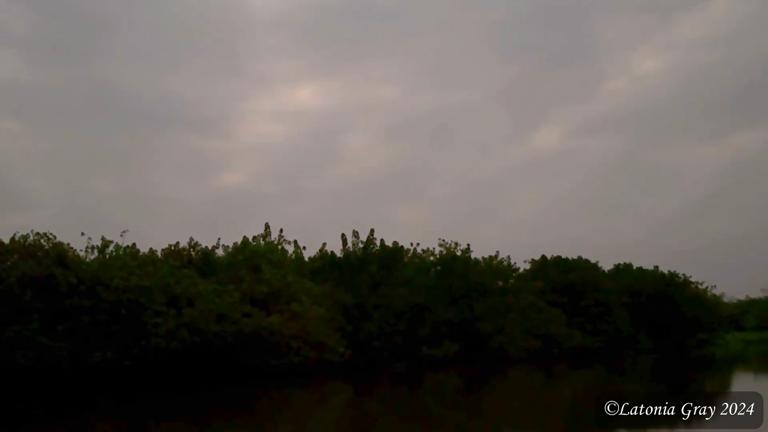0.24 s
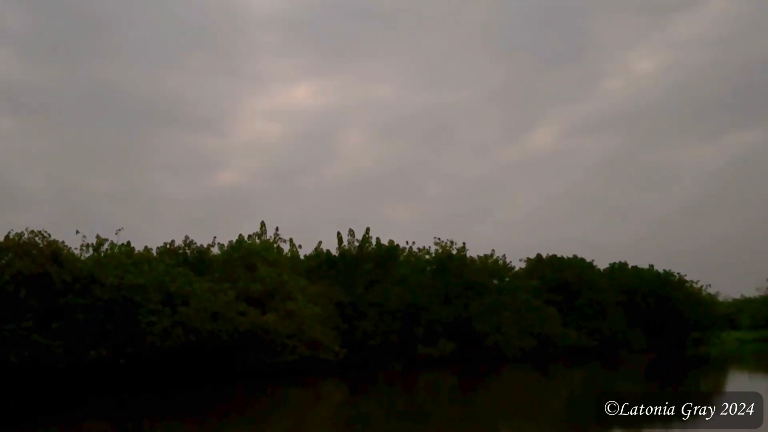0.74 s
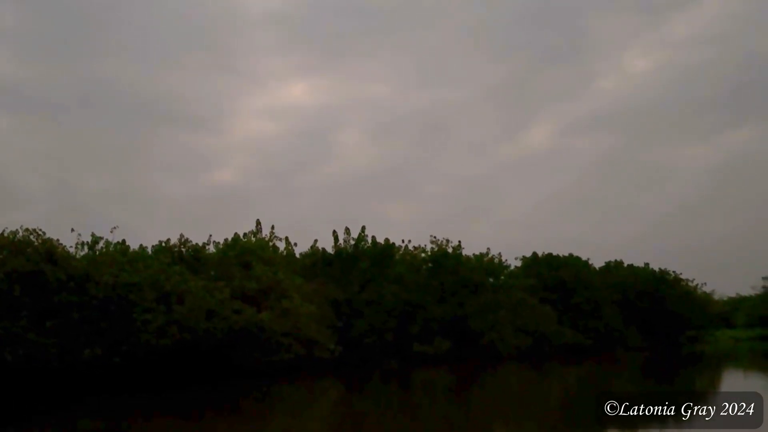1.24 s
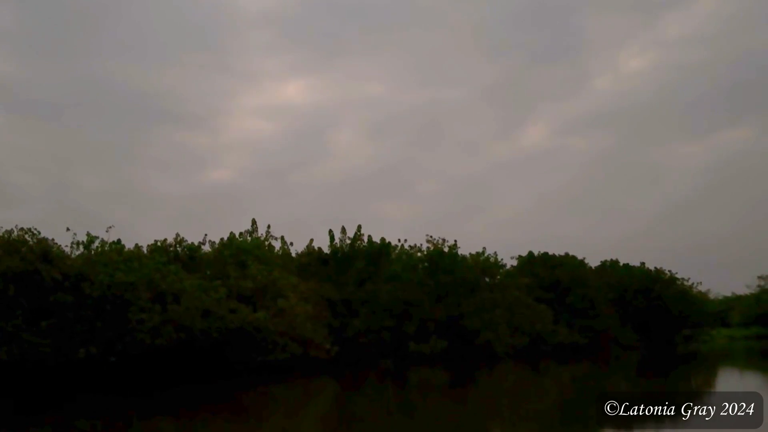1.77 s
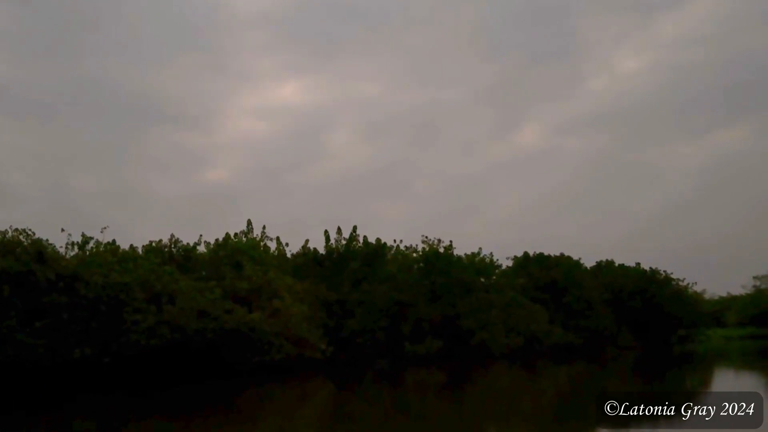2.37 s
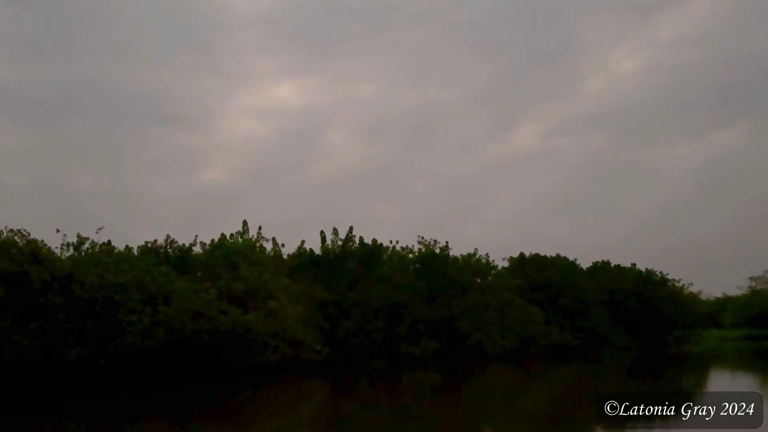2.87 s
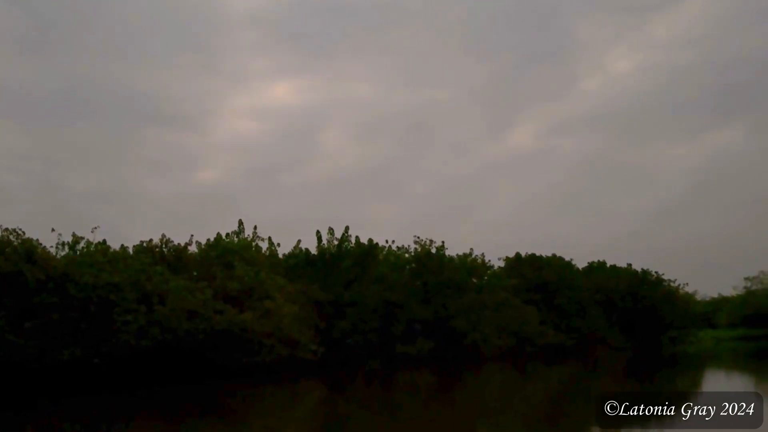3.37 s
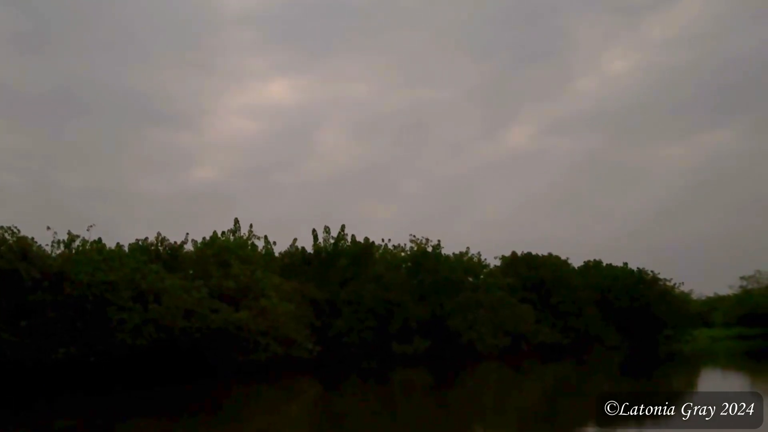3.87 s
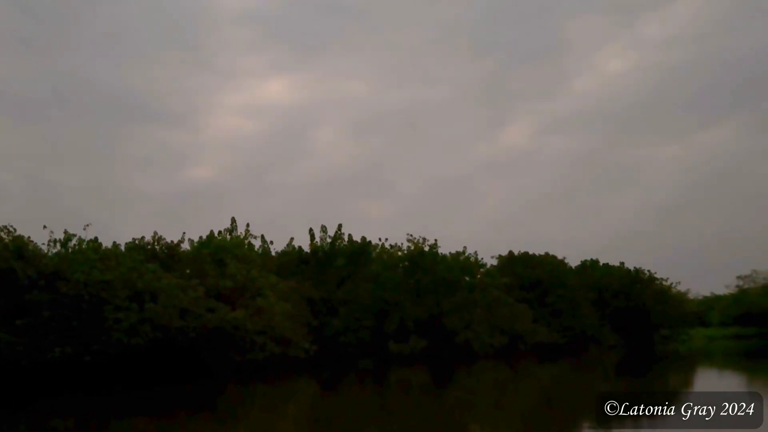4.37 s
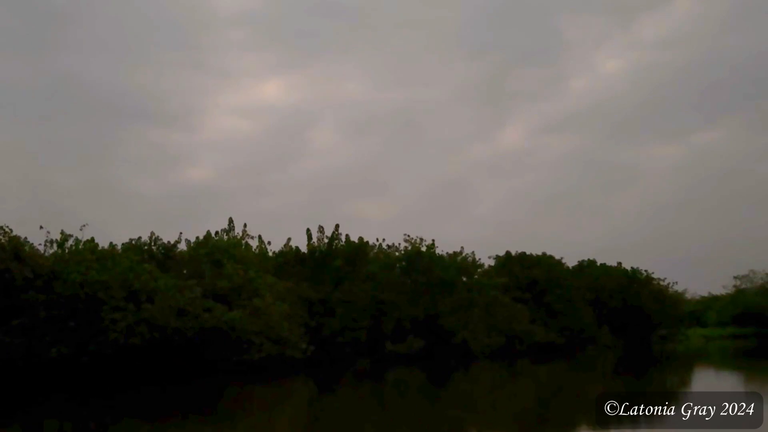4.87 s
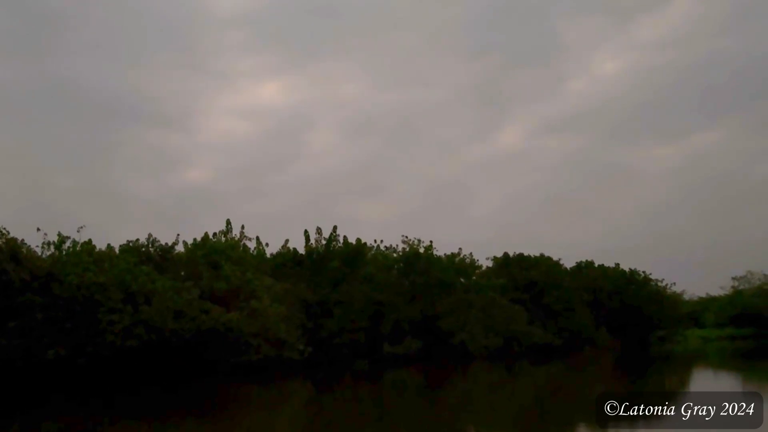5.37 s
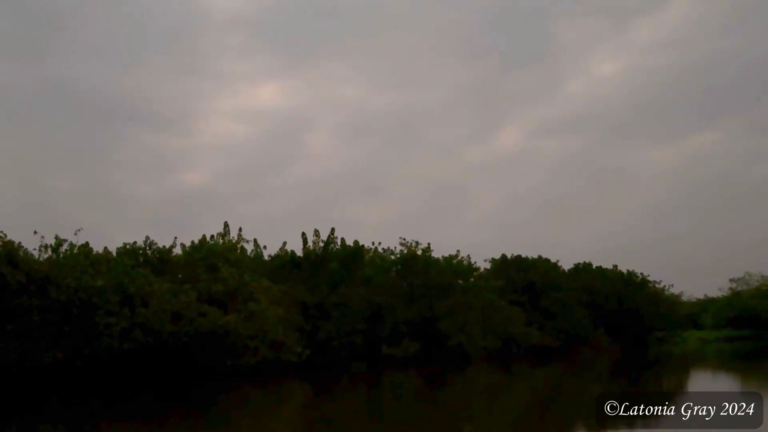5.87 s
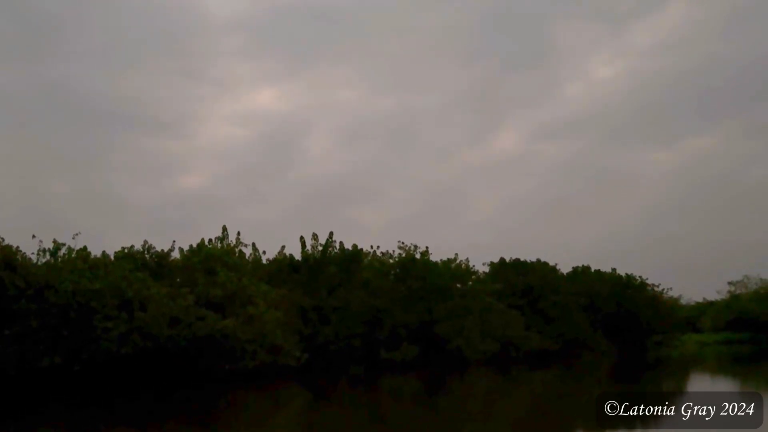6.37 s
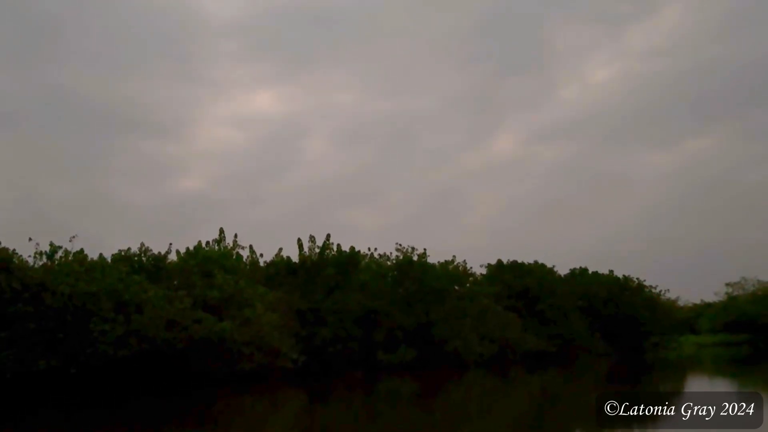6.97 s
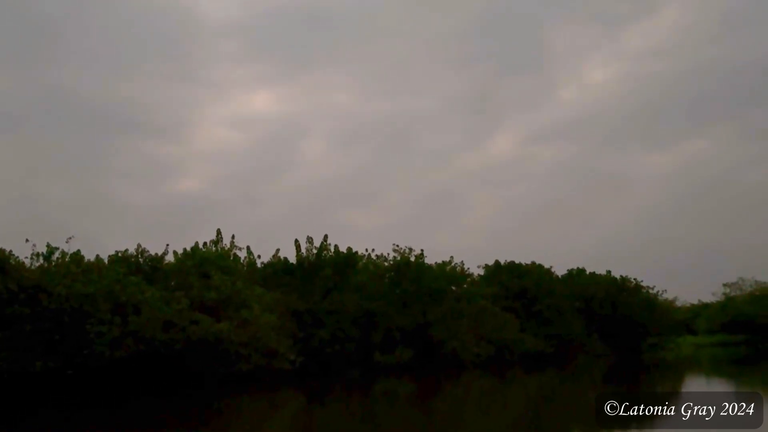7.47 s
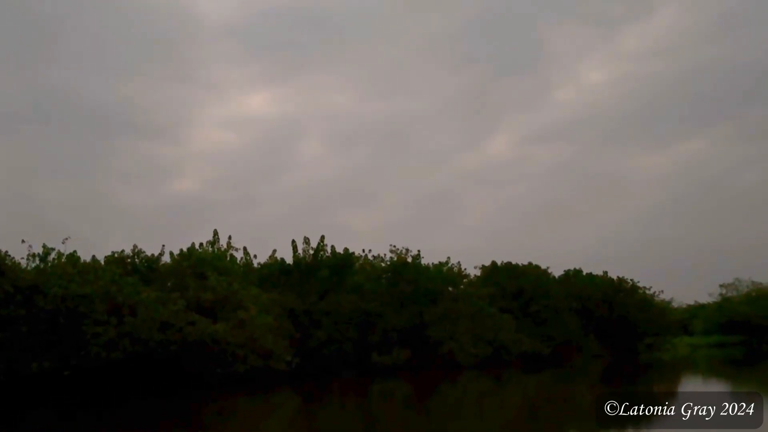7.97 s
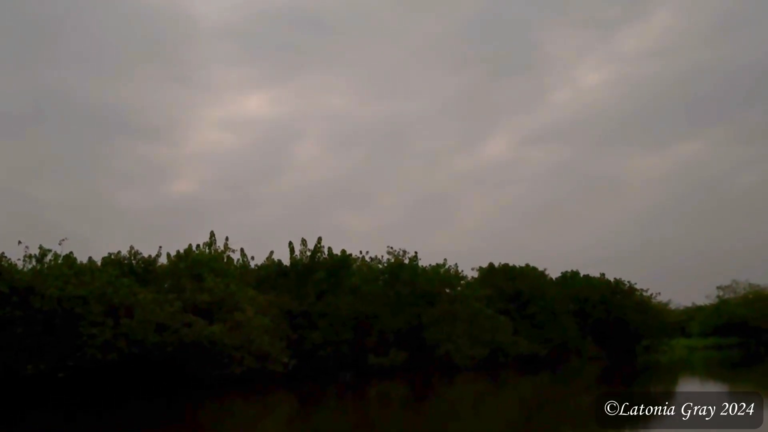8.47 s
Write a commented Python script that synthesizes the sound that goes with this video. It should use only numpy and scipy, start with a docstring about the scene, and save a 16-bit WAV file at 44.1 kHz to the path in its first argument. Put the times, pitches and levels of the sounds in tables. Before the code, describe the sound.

A flock of small birds chirps and trills in a dense, high chorus, over hissing insects and a light breeze.

```python
"""Rolled, arching calls of bee-eaters roosting in trees across still water at dusk, near ones over a crowd.
Higher birds whistle, chip and swoop among them. Each call is a gliding near-sine, scattered by leaves
and water. Insects hiss and rasp over a light breeze; a hollow pop and soft bumps come from close by.
The stereo image is widest in the upper treble and narrows to centre near 2 and 6 kHz."""
import sys
import numpy as np
from scipy import signal
from scipy.fft import rfft, irfft, next_fast_len
from scipy.io import wavfile
from scipy.ndimage import uniform_filter1d

SR = 44100
rng = np.random.default_rng(int(sys.argv[2]) if len(sys.argv) > 2 else 0)


def output_pcm(signal):
    """Save a mono or channel-first signal as 16-bit PCM at the path in sys.argv[1].

    Samples are clipped to [-1, 1] before scaling.
    """
    pcm = np.clip(np.atleast_2d(signal).T, -1, 1) * 32767
    wavfile.write(sys.argv[1], SR, np.round(pcm).astype(np.int16))


N = 385434

# Near bee-eaters. Each row: start in seconds, length in seconds, level in dB, turn pitch in Hz,
# arch height in Hz (negative dips).
BEE_EATER_CALLS = [(.009, 0.027, -45.5, 2276, 17), (0.02, 0.094, -47.5, 2344, -250),
                   (0.108, 0.035, -52.5, 2300, -200), (.207, 0.072, -48.5, 2810, 423),
                   (.304, 0.057, -42.5, 2570, 329), (0.405, 0.075, -58.5, 2430, -4),
                   (0.497, 0.044, -55, 2700, 100), (0.527, 0.043, -49, 3040, 148),
                   (0.631, .047, -44, 2475, 144), (0.645, 0.05, -57, 2800, 73),
                   (0.84, 0.052, -42.5, 2536, 358), (0.857, 0.062, -53, 2720, 0),
                   (.973, 0.052, -50, 2640, 238), (1.173, 0.086, -56, 2830, 222),
                   (1.197, .054, -41, 2560, 328), (1.337, 0.11, -55, 2765, 102),
                   (1.379, .091, -49, 3070, 287), (1.542, .054, -54.5, 2630, 411),
                   (1.602, 0.059, -45, 2582, 410), (1.739, .058, -48.5, 2800, -280),
                   (1.795, 0.058, -47, 2735, 364), (1.883, .063, -47.5, 2507, 148),
                   (2.01, 0.069, -54.5, 3180, 243), (2.122, .065, -45.5, 2570, 288),
                   (2.342, 0.058, -45.5, 2610, 80), (2.348, 0.036, -50, 2980, 125.5),
                   (2.418, 0.077, -51, 3022, 87), (2.751, 0.079, -58, 3030, 365),
                   (2.874, 0.047, -58, 2940, 304), (2.921, 0.059, -53, 2560, 70),
                   (2.953, 0.074, -50.5, 3080, 33), (3.021, 0.094, -59.5, 2840, -180),
                   (3.097, 0.021, -55, 2750, 300), (3.285, 0.068, -48, 2890, 642),
                   (3.289, 0.044, -46.5, 3043, 423), (3.302, 0.032, -44, 2607, 195),
                   (3.386, .093, -49.5, 2880, 178), (3.572, 0.044, -48.5, 3020, 383),
                   (3.83, .053, -51.5, 2760, 242), (3.886, 0.049, -56, 2770, 426),
                   (4.049, 0.064, -48.5, 2910, 299), (4.176, 0.077, -55.5, 3050, 721),
                   (4.28, 0.047, -50.5, 2450, 277), (4.411, 0.061, -50.5, 2488, -150),
                   (4.553, 0.089, -56, 2647, -91), (4.624, 0.086, -65, 2970, 307),
                   (4.655, 0.044, -44, 2870, 43), (4.741, 0.033, -46.5, 2763, 112),
                   (4.853, 0.071, -55, 2790, 384), (4.985, 0.035, -48, 2586, 149),
                   (5.022, 0.089, -48.5, 2587, -160), (5.093, 0.07, -54.5, 2950, 644),
                   (5.241, 0.084, -60, 2950, 688), (5.295, 0.021, -57, 2600, 100),
                   (5.437, 0.086, -55, 2815, 252), (5.664, 0.072, -66, 2820, 440.5),
                   (5.789, .043, -56, 2920, -26), (5.824, 0.074, -51.5, 3060, 589.5),
                   (5.965, .074, -49, 2993, 220), (6.097, 0.039, -50, 2625, -270),
                   (6.191, 0.06, -51, 3050, 534.5), (6.281, 0.05, -45.5, 2740, 54),
                   (6.582, .071, -50.5, 2900, -180), (6.633, 0.071, -57, 2824, 12),
                   (6.879, 0.051, -46, 2975, 319), (6.967, 0.037, -45, 3045, 383),
                   (6.991, 0.066, -54.5, 2224, 7), (7.026, 0.14, -55, 2514, -100),
                   (7.158, 0.086, -53.5, 2574, -230), (7.363, 0.055, -45, 2950, 90),
                   (7.381, 0.039, -47, 2590, 62), (7.426, .065, -49, 2860, 352),
                   (7.467, 0.037, -49, 2940, 0), (7.559, 0.073, -51, 2823, 383.5),
                   (7.673, 0.077, -50, 2430, -220), (7.706, 0.04, -51.5, 3030, 270),
                   (7.829, 0.086, -55.5, 2556, 108), (8.038, 0.083, -48, 2580, 104),
                   (8.077, 0.037, -39.5, 2663, -52), (8.218, 0.054, -51, 3053, -120),
                   (8.322, 0.067, -47.5, 2703, 370), (8.436, 0.1, -51.5, 2867, -3),
                   (8.523, 0.048, -41, 2555, -26), (8.564, 0.072, -55.5, 2433, -100),
                   (8.637, 0.051, -44.5, 2380, -29), (8.66, 0.057, -52.5, 3114, 20)]
# Higher birds. Each row: start in seconds, length in seconds, level in dB, mid pitch in Hz, glide in Hz.
WHISTLES = [(0.076, 0.044, -57, 4950, 193), (0.206, 0.06, -58, 5000, 492), (0.629, .04, -55.5, 5280, 300),
            (.672, 0.04, -64, 4720, -150), (0.731, .04, -66, 5080, 498), (0.962, 0.031, -62.5, 4950, 500),
            (1.084, 0.017, -51, 5000, 337), (1.147, 0.069, -59, 5020, 203), (1.26, 0.037, -56, 5280, 500),
            (1.307, 0.02, -51, 5100, 400), (1.384, 0.02, -49, 5200, 800), (1.446, 0.012, -47.5, 4850, -880),
            (1.567, 0.03, -54.5, 4660, -1000), (1.598, 0.02, -50.5, 5060, 422),
            (1.675, 0.023, -54.5, 4880, 200), (1.828, 0.072, -65, 5760, 304),
            (2.078, .045, -62, 5450, -150), (2.157, 0.098, -62.5, 4980, -100),
            (2.328, 0.065, -53.5, 4870, -140), (2.482, 0.036, -64.5, 5360, 4), (2.745, .05, -70, 4700, 0),
            (2.962, 0.057, -58.5, 5010, 39), (3.1, .12, -63.5, 4685, -100),
            (3.319, 0.049, -53.8, 4390, 197), (3.363, .113, -54.5, 4450, 198),
            (3.366, 0.084, -58, 4890, -51), (3.561, 0.047, -56.5, 4450, 142),
            (3.594, 0.11, -51.5, 4670, -580), (3.848, .059, -48, 4430, 150), (3.902, 0.12, -49, 4510, -100),
            (4.064, 0.027, -47, 4530, -53), (4.103, 0.055, -55.5, 4430, 348),
            (4.161, 0.075, -49.5, 4486, -140), (4.198, 0.073, -59, 4570, -470),
            (4.322, 0.038, -53, 5010, 43), (4.398, 0.077, -56.5, 4390, -100),
            (4.414, 0.073, -58, 5360, 278), (4.423, .064, -50.5, 4980, 285), (4.543, .036, -51, 5020, 330),
            (4.552, 0.079, -51.5, 5580, 900), (4.646, 0.036, -47.5, 5180, -2),
            (4.703, 0.069, -54, 5500, 898), (4.736, 0.03, -46.5, 5170, 390), (4.867, 0.055, -57, 4860, 90),
            (4.992, 0.047, -61, 5150, 700), (5.833, 0.049, -55, 4800, -170), (5.958, 0.053, -52, 5400, 601),
            (5.962, 0.021, -51, 4870, 55.5), (6.11, 0.04, -49.5, 5230, 752),
            (6.509, 0.063, -55.5, 4650, -450), (6.682, .11, -65, 4970, -50), (6.867, 0.041, -54, 5010, 771),
            (7.01, 0.12, -65, 4830, 800), (7.147, 0.046, -51.5, 4900, -950),
            (7.159, 0.071, -60, 5310, -300), (7.366, 0.023, -55, 5130, 88), (7.44, 0.037, -55, 5680, 504),
            (7.53, 0.086, -67.5, 5020, -200), (7.705, .031, -57, 4770, 122),
            (7.783, 0.021, -54.5, 4950, 92), (7.813, 0.16, -62.5, 4960, -200),
            (8.111, 0.056, -53.5, 4820, 322), (8.327, 0.087, -55.5, 4930, 0),
            (8.511, 0.037, -64.5, 4930, 700)]
# One bird's repeated swoop. Each row: start in seconds, level in dB.
SWOOPS = [(4.854, -61), (5.045, -50.5), (5.243, -57.5), (5.426, -54), (5.651, -51), (5.861, -55.5),
          (6.064, -56), (6.266, -59.5)]
# Swoop contour. Each row: offset in seconds, pitch in Hz, gain in dB.
SWOOP_SHAPE = [(0, 4330, -8), (.006, 4420, 0), (.026, 4750, -4), (.035, 5250, -5), (.041, 6050, -2),
               (.044, 6100, -30), (.051, 6100, -30), (.054, 6000, -3), (.058, 5200, -9), (.063, 3700, -14),
               (.068, 3000, -28)]
# Far crowd before hushing. Each row: time in seconds, bee-eater level in dB, higher-bird level in dB.
CROWD_LEVELS = [(0, -59, -69), (.6, -55.5, -66), (.9, -54, -56), (1.45, -55, -62.5), (2.05, -58, -74),
                (2.3, -53, -73), (2.58, -52.5, -53), (2.68, -59, -94), (2.76, -45.5, -54),
                (3.24, -51.5, -64), (3.72, -52, -59), (3.81, -55, -78), (3.89, -51.5, -65),
                (4.14, -56, -67), (4.22, -51, -66), (4.39, -54.5, -61), (4.6, -52.5, -55),
                (4.81, -60, -64.5), (5.09, -49, -58), (5.22, -66.5, -85), (5.29, -58, -53),
                (5.37, -54, -86), (5.46, -54, -52), (5.57, -65, -67), (5.67, -50.5, -57), (5.76, -63, -74),
                (5.84, -55.5, -63), (6.28, -53.5, -65.5), (6.39, -57.5, -59), (6.46, -49.5, -63),
                (6.83, -57.5, -63.5), (6.92, -55, -64), (7.25, -52, -60), (7.32, -68, -69), (7.4, -58, -73),
                (7.899, -52.5, -63), (8.3, -55, -62), (8.74, -51, -81)]
# Pop partials. Each row: harmonic number, level in dB, relative ring level in dB.
POP_PARTIALS = [(1, -20.5, -20.5), (2, -36, -16.5), (3, -39.5, -23.5), (4, -42, -22.5)]
# Near bumps. Each row: start in seconds, level in dB, pitch in Hz, T60 in seconds.
BUMPS = [(0.157, -43, 151.7, 0.26), (0.201, -39.5, 72.7, 0.16), (3.148, -49, 59.3, 0.2),
         (4.619, -57, 54.6, 0.23), (4.687, -49.5, 44.5, 0.31), (5.842, -20.5, 70, 0.055),
         (6.79, -57.5, 67, 0.4), (7.007, -44.5, 72, 0.11)]
# Katydid stroke pairs. Each row: first stroke's centre in seconds, relative level in dB.
STROKE_PAIRS = [(.373, -70), (.826, -63), (2.297, -67), (2.42, -76), (2.603, -70), (2.82, -73),
                (2.939, -74), (2.99, -70), (3.345, -69), (3.39, -69), (4.056, -69), (4.465, -67),
                (5.253, -66), (5.51, -74), (5.763, -71), (5.8, -66), (6.118, -67), (6.66, -67.5),
                (7.22, -75), (7.748, -69), (8.03, -72), (8.686, -71)]
# Evening air with the insect band. Each row: frequency in Hz, relative density in dB.
AIR_SPECTRUM = [(25, -50.5), (45, -7.5), (70, -9.5), (190, -12), (400, -20.5), (800, -22.5), (1200, -17.5),
                (2000, -17), (3800, -20.5), (5900, -20), (6900, -5), (7600, -17.5), (9000, -22.5),
                (11500, -33), (15800, -30)]
# Breeze. Each row: time in seconds, bass gain in dB.
BREEZE = [(0, 3), (1.201, 7.5), (1.702, -1), (4, 2), (6.297, -3), (6.999, 0), (7.6, -4), (8.74, -2.5)]
# Stereo side noise. Each row: frequency in Hz, level relative to the air in dB.
SIDE_SPECTRUM = [(60, -11), (300, -16.5), (700, -12), (1400, -25.5), (2400, -38.5), (7000, -15),
                 (15000, -22.5)]
# Stereo phase spread by frequency; the image narrows to centre near 2 and 6 kHz.
# Each row: frequency in Hz, left-right phase in half cycles (capped at 1 in use).
PHASE_SPREAD = [(60, .07), (300, 0.11), (1300, 0.36), (1900, 0.033), (2800, 0.15), (3700, 0.14),
                (4600, 0.17), (5800, .01), (6600, 0.17), (7200, 0.21), (7900, 1.28), (9300, 0.96),
                (10500, 0.56), (15600, 0.41)]


def bee_eaters(voice, turn_share=.48, fall_ratio=1.15):
    """Near rolled calls: pitch arches to a turn, then returns just past its start."""
    calls = [(s, turn_share * length_s, (1 - turn_share) * length_s, db,
              hz - arch_hz, hz, hz - fall_ratio * arch_hz)
             for s, length_s, db, hz, arch_hz in BEE_EATER_CALLS]
    return near_birds(calls, voice)


def whistlers(voice, bow=.012):
    """Whistles and chips: one slightly bowed glide each."""
    calls = [(s, length_s / 2, length_s / 2, db,
              hz * (1 - bow) - glide_hz / 2, hz * (1 + bow), hz * (1 - bow) + glide_hz / 2)
             for s, length_s, db, hz, glide_hz in WHISTLES]
    return near_birds(calls, voice)


def near_birds(calls, voice):
    """Single calls at set times; the loudest tremble least."""
    out = np.zeros(N)
    for (s, first_s, second_s, db, *contour_hz), luck in zip(calls, rng.random((len(calls), 3))):
        luck[2] *= np.clip((-40 - db) / 16, 0, 1)
        add(out, s, amp(db) * call(first_s, second_s, contour_hz, luck, **voice))
    return out


def call(first_s, second_s, contour_hz, luck, cut_depth, gap_s, flick, tremble, waver, partials_db):
    """Trembling near-sine on a two-leg glide; the roll cuts it twice, flicking up before each cut."""
    t = np.arange(max(round((first_s + second_s) * SR), 8)) / SR
    since_cut_s = t - first_s - gap_s * (np.array([[-.6], [.4]]) + .43 * (np.c_[luck[:2]] - .5))
    hz = np.interp(t, [0, first_s, first_s + second_s], contour_hz)
    hz *= 1 + flick * (np.exp(np.minimum(since_cut_s, 0) / .0015) * (since_cut_s < 0)).sum(0)
    shake = luck[2] * np.sin(2 * np.pi * (125 * (1 + luck[0]) * t + luck[1]))
    sway = np.sin(2 * np.pi * (24.2 * t + luck[1]))
    cycles = np.cumsum(hz * (1 + tremble * shake + waver * sway)) / SR + luck[2]
    tone = np.sin(2 * np.pi * cycles)
    tone += sum(amp(db) * np.sin(2 * np.pi * ratio * cycles) for ratio, db in partials_db.items())
    cuts = (1 - cut_depth * np.exp(-((since_cut_s - .002) / .0028) ** 2)).prod(0)
    fades = np.minimum(t / .009, 1) * np.minimum((t[-1] - t) / .008, 1)
    return unit_rms(tone * cuts * (1 + .5 * shake)) * fades


def swoops():
    """Steepening rise, break, snap down; weak second harmonic, strong suboctave."""
    s, hz, db = np.transpose(SWOOP_SHAPE)
    out, t = np.zeros(N), np.arange(0, s[-1], 1 / SR)
    phase = 2 * np.pi * np.cumsum(np.interp(t, s, hz)) / SR
    tone = np.sin(phase) + amp(-24.5) * np.sin(2 * phase) + amp(-1.5) * np.sin(phase / 2)
    swoop = np.sqrt(2) * amp(np.interp(t, s, db)) * tone
    for start_s, level_db in SWOOPS:
        add(out, start_s, amp(level_db) * swoop)
    return out


def crowd(gain_db, voice, column, count, low_hz, high_hz, arch, leg_s, spread_db):
    """Far birds: overlapping calls at random times, levelled, then shaped by the crowd's contour."""
    out = np.zeros(N)
    for when, pitch, loudness, bend, *luck in rng.random((count, 7)):
        hz = low_hz + (high_hz - low_hz) * pitch
        contour_hz = [hz * (1 - arch), hz, hz * (1 - arch * 1.462 * bend)]
        sound = call(leg_s * (.5756 + .791 * bend), leg_s, contour_hz, luck, **voice)
        add(out, when * N / SR, amp(spread_db * loudness) * sound)
    out /= np.sqrt(uniform_filter1d(out ** 2, 4000) + .15 * np.mean(out ** 2))
    levels = np.transpose(CROWD_LEVELS)
    return out * amp(np.interp(np.arange(N) / SR, levels[0], levels[column]) + gain_db)


def hush_db(near, floor_db, knee_db, window_s=.028, linger_s=.042):
    """Crowd gain: joins in with the near birds, lingers, sinks between their calls."""
    pole = np.exp(-1 / (linger_s * SR))
    power = uniform_filter1d(near ** 2, round(window_s * SR)).clip(0)
    power = signal.lfilter([1 - pole], [1, -pole], power)
    return floor_db / (1 + power / amp(knee_db) ** 2)


def foliage(x, wet_db, t60_s=.14):
    """Leaves and water scatter each call into a short trail of echoes."""
    slots = np.arange(150, SR // 3, 20)
    taps = np.zeros(SR // 3 + 20)
    echoes = rng.choice([-1., 1.], len(slots)) * amp(-60 * slots / SR / t60_s)
    taps[slots + rng.integers(0, 20, len(slots))] = echoes
    return x + amp(wet_db) * signal.oaconvolve(x, taps / np.linalg.norm(taps))[:N]


def pop(at_s=5.8408, hz=378, rise_s=.005, fall_s=.0052):
    """Hollow pop: swells, slides slightly up, dies, rings on faintly."""
    out, t = np.zeros(N), np.arange(-SR // 10, SR // 5) / SR
    cycles = hz * (t + .03 * .01 * np.log(np.cosh(t / .01)))
    for k, db, ring_db in POP_PARTIALS:
        age_s = t + .0014 * (k > 1)  # upper partials peak first
        swell = 2 / (np.exp(-age_s / rise_s) + np.exp(age_s / fall_s * k))
        ring = amp(ring_db) * np.exp(-abs(t - .028) / .018) * (t > 0)
        tone = np.cos(2 * np.pi * k * cycles + np.pi * (k + 1))
        add(out, at_s + t[0], amp(db) * (swell + ring) * tone)
    return out


def bumps(attack_s=.0075):
    """Dull damped tones; pitch sags as the blow lets go."""
    out, t = np.zeros(N), np.arange(SR // 2) / SR
    for s, db, hz, t60_s in BUMPS:
        cycles = hz * (t + .0055 * (1 - np.exp(-t / .0016)))
        envelope = amp(db - 60 * t / t60_s) * (1 - np.exp(-t / attack_s))
        add(out, s, envelope * np.sin(2 * np.pi * cycles))
    return out


def katydid(width_s=.0078, gap_s=.041, ticks_per_s=40):
    """Paired strokes of grainy top-treble hiss, over stray ticks."""
    envelope, t = np.zeros(N), np.arange(-SR // 20, SR // 10) / SR
    stroke = np.exp(-abs(t) / width_s) + .16 * np.exp(-abs(t) / .05)
    for s, db in STROKE_PAIRS:
        add(envelope, s + t[0], amp(db) * stroke)
        add(envelope, s + gap_s + t[0], amp(db - .5) * stroke)
    tick_db = -63 + 6.2 * np.minimum(rng.exponential(1, N), 4)
    ticks = amp(tick_db) * (rng.random(N) < ticks_per_s / SR)
    grain = amp(2.5 * drift(N, 40))
    hiss = highpass(grain * rng.standard_normal(N), order=3, hz=14000)
    return amp(7) * envelope * unit_rms(hiss) + highpass(ticks, order=2, hz=8500)


def air(level_db=-59):
    """Insect hiss and light wind: noise with drifting patches and gusty bass. Returns mid and side."""
    frames, hz = (N // 128 + 5) // 2, np.fft.rfftfreq(1024, 1 / SR)[:, None]
    mid_re, mid_im, side_re, side_im, patches = rng.standard_normal((frames, 513, 5)).T
    patches = unit_rms(uniform_filter1d(uniform_filter1d(patches, 14, 0), 8, 1))
    gust_db = 2.2 * drift(frames, 10) + np.interp(np.arange(frames) * 256 / SR, *np.transpose(BREEZE))
    db = log_interp(AIR_SPECTRUM, hz) + 2.59 * patches + gust_db / (1 + (hz / 900) ** 2)
    db += 2.6 * drift(frames, 5) / (1 + (9000 / (hz + 1)) ** 6)  # top treble flickers as one
    side_gain = amp(log_interp(SIDE_SPECTRUM, hz))
    spectra = amp(db) * np.array([mid_re + 1j * mid_im, (side_re + 1j * side_im) * side_gain])
    mid_side = signal.istft(spectra, nperseg=1024, noverlap=768)[1][:, :N]
    return amp(level_db) * mid_side / np.sqrt(np.mean(mid_side[0] ** 2))


def amp(db):
    """dB to gain."""
    return 10 ** (np.asarray(db) / 20)


def unit_rms(x):
    """Scales to rms 1."""
    return x / np.sqrt(np.mean(x ** 2) + 1e-20)


def drift(count, width):
    """Smoothed noise, rms 1."""
    return unit_rms(uniform_filter1d(rng.standard_normal(count), width))


def highpass(x, order, hz):
    """Butterworth high-pass."""
    return signal.sosfilt(signal.butter(order, hz, "high", fs=SR, output="sos"), x)


def log_interp(points, hz):
    """Interpolates on a log-frequency axis."""
    point_hz, values = np.transpose(points)
    return np.interp(np.log(hz + 1), np.log(point_hz + 1), values)


def add(mix, start_s, sound):
    """Mixes a sound in."""
    part = mix[max(round(start_s * SR), 0):][:len(sound)]
    part += sound[:len(part)]


def scene():
    """Birds through foliage, over pop, bumps, insects and air; stereo."""
    rolled = dict(cut_depth=.9, gap_s=.015, flick=.16, tremble=.03, waver=0,
                  partials_db={.5: -28, 2: -26})
    clear = dict(cut_depth=.99, gap_s=.02, flick=.03, tremble=.035, waver=.011,
                 partials_db={2: -27, 2.5: -23})
    rolls = bee_eaters(rolled)
    whistles = whistlers(clear) + swoops()
    near = rolls + whistles
    far = crowd(hush_db(near, floor_db=-7, knee_db=-56), rolled, column=1, count=650,
                low_hz=2456, high_hz=3153, arch=.18, leg_s=.028, spread_db=8)
    far += crowd(hush_db(whistles, floor_db=-11, knee_db=-64), clear, column=2, count=500,
                 low_hz=4510, high_hz=5267, arch=.0398, leg_s=.02176, spread_db=3.5)
    mid, side = air()
    mid += foliage(near, wet_db=-7) + foliage(far, wet_db=-4)
    mid += pop() + bumps() + katydid()
    return np.array([mid + side, mid - side])


def record(dry):
    """Spreads left and right in phase by frequency, then low-passes."""
    size, cutoff_hz = next_fast_len(N + 4096), 15830
    shift_rad = np.pi / 2 * np.clip(log_interp(PHASE_SPREAD, np.fft.rfftfreq(size, 1 / SR)), 0, 1)
    mid, side = rfft(dry[0] + dry[1], size) / 2, rfft(dry[0] - dry[1], size) / 2
    stereo = irfft([mid * np.exp(1j * shift_rad) + side, mid * np.exp(-1j * shift_rad) - side], size)
    lowpass = signal.firwin(1023, cutoff_hz, window=("kaiser", 9), fs=SR)
    return signal.oaconvolve(stereo[:, :N], lowpass[None], "same")


dry = scene()
out = record(dry)
output_pcm(out)
```